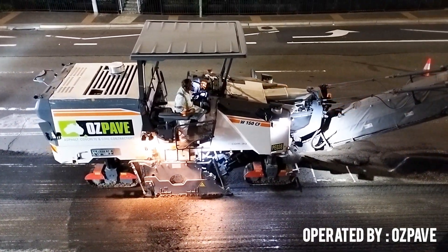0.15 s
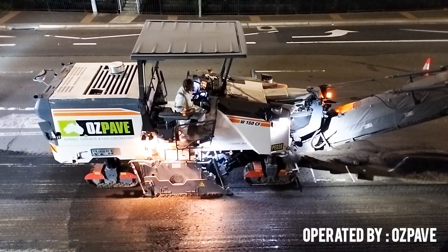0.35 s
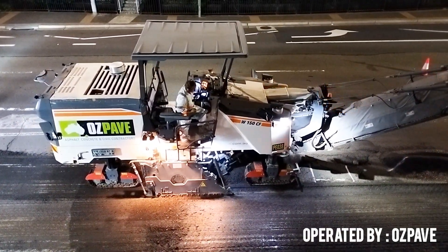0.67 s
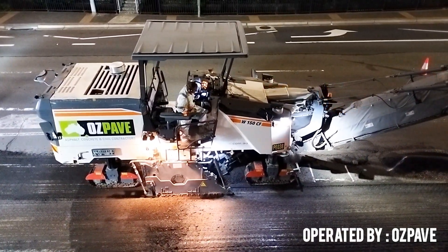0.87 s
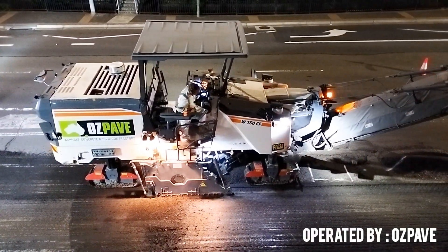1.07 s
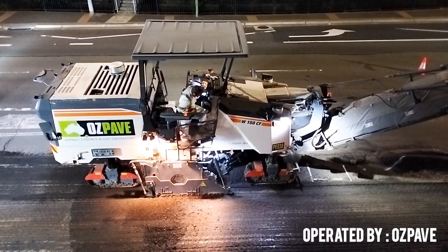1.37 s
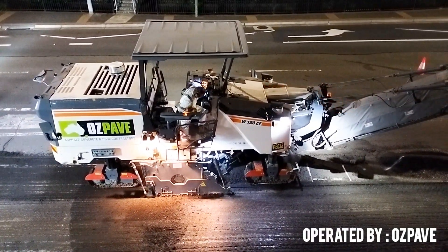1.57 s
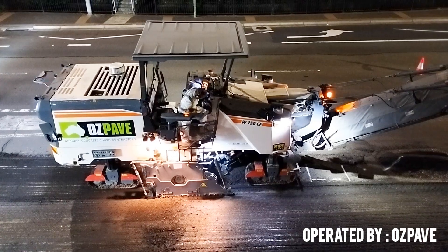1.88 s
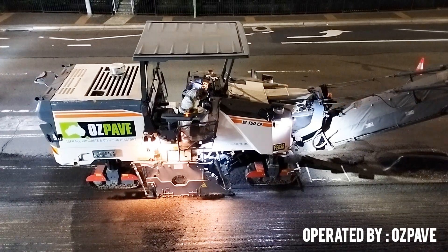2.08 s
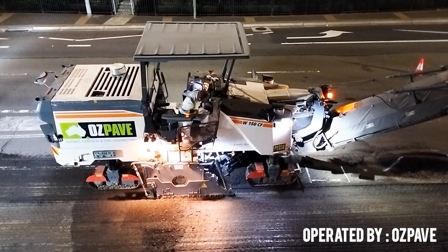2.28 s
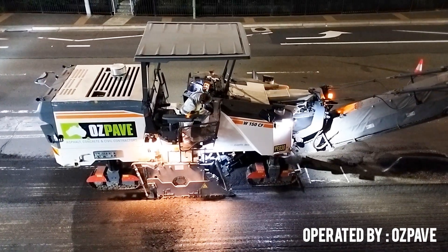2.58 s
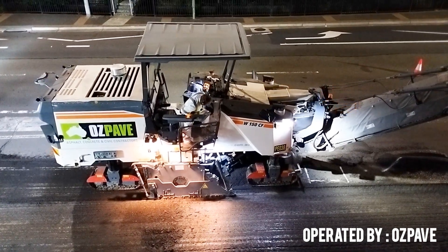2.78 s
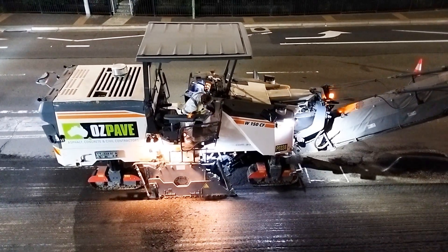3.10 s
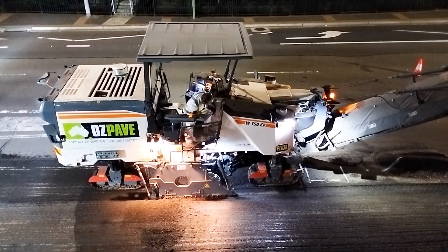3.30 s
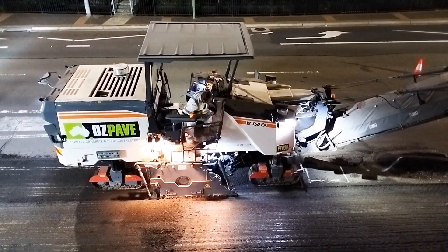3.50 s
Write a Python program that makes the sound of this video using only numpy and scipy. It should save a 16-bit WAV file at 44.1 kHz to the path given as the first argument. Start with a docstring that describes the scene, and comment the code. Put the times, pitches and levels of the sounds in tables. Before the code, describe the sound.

A heavy road milling machine drones and roars steadily as stones clatter down its metal chute.

```python
"""A road milling machine is heard from above through two spaced microphone ports.
The diesel drones as a sum of sines at its firing tone and weaker engine orders, with a turbo whistle of
wandering pitch, pump teeth and brief squeals. Fan, drum and conveyor roar as flickering filtered noise.
Stones strike the modes of a steel chute: a spill that dies away, with knocks at the start, a lone knock
near one second and a quick cluster near 1.6 seconds, each with a noise rattle; a low thud fades beneath."""
import sys
import numpy as np
from scipy import signal
from scipy.fft import rfft, irfft, next_fast_len
from scipy.io import wavfile
from scipy.ndimage import uniform_filter1d

SR = 44100
rng = np.random.default_rng(int(sys.argv[2]) if len(sys.argv) > 2 else 0)


def unload_audio(sound):
    """Save the sound as a 16-bit wav file, at the path given as the first command line argument."""
    columns = np.transpose(np.atleast_2d(sound))
    # keep every value between -1 and 1, then stretch to whole-number steps
    steps = np.round(np.clip(columns, -1, 1) * 32767)
    wavfile.write(sys.argv[1], SR, steps.astype(np.int16))


def decibels_to_gain(level_db):
    """Convert a level in decibels to a linear amplitude gain (20 dB per decade)."""
    exponent = np.asarray(level_db, float) / 20
    return 10 ** exponent


N = 160965  # samples

# Spectrum of the roar at the left port. Each row: frequency in Hz, density in dB per Hz before flicker.
ROAR_SPECTRUM = [(20, -76), (45, -59), (70, -48.5), (100, -46.5), (125, -44), (200, -40), (300, -41),
                 (420, -44), (520, -48), (650, -51), (820, -50), (1050, -55), (1300, -57), (2200, -62),
                 (3000, -65.5), (3900, -66.5), (4700, -72.5), (6200, -73), (7300, -73.5), (7900, -82),
                 (8400, -81), (11600, -81), (12600, -84), (14200, -87.5)]
# How the ports differ. Each row: frequency in Hz, right minus left level in dB, likeness from 0 to 1.
PORT_DIFFERENCE = [(25, 0, 0.95), (60, -1.5, 0.95), (150, 1.5, 0.98), (318, 0, 1), (454, 1.3, 0.78),
                   (694, 1, 0.43), (990, 0.5, 0.44), (1300, 1, 0.24), (2200, -4.5, 0.35), (2890, 1.5, 0.45),
                   (3700, 6, 0.01), (5200, 9.5, 0.33), (6180, 3.5, 0.07), (7340, 2.5, 0.07),
                   (8300, -6.5, .15), (9500, -31, .1), (10600, -1.5, 0), (11700, 2, 0), (12800, -11.5, 0.3),
                   (14200, -11, .05)]
# Slow level changes of the low roar and weaker orders. Each row: time in seconds, change in dB.
LOW_LEVEL = [(0, -0.5), (.3, -4), (.6, -1.5), (1.2, -0.9), (2.4, -1), (3.65, -0.9)]
# Firing tone of the diesel. Each row: time in seconds, frequency in Hz, rms level in dB before its waver.
FIRING_TONE = [(0.0, 102.2, -35), (0.01, 104.9, -26), (0.48, 102.5, -17.5), (0.58, 102.7, -21),
               (0.66, 102.9, -14), (1.1, 102.7, -15), (1.11, 102.6, -19.5), (1.28, 103.5, -14),
               (1.51, 102.1, -14), (1.66, 103, -19), (1.91, 103.4, -11), (2.3, 102.7, -16.5),
               (2.55, 102.6, -10.5), (2.89, 104, -19), (2.92, 103.5, -14), (3.28, 102.5, -14),
               (3.46, 101.1, -17.5), (3.65, 103.6, -11)]
# Weaker engine orders. Each row: multiple of the firing frequency, relative level in dB.
ENGINE_ORDERS = [(.25, -46), (.335, -46), (.6, -42), (.75, -38), (1.25, -35), (1.5, -30), (1.75, -33),
                 (2, -26), (2.25, -31), (2.5, -25), (2.7, -32), (2.85, -32), (3, -31), (3.25, -32),
                 (3.5, -32), (4, -33), (4.35, -35), (5.87, -40), (8.03, -42)]
# Pitch of the turbo whistle. Each row: time in seconds, frequency in Hz before its small jitter.
TURBO_PITCH = [(0.4, 11852), (0.63, 12193), (0.8, 11806), (1.04, 11702), (1.25, 12294), (1.43, 11941),
               (1.6, 11733), (1.8, 12124), (2.06, 11551), (2.25, 11461), (2.38, 11871), (2.55, 11623),
               (2.85, 11459), (2.98, 12045), (3.15, 11645), (3.4, 11431), (3.52, 11809), (3.63, 11686),
               (3.65, 11388)]
# Teeth of the hydraulic pump. Each row: multiple of the pump frequency, rms level at the start in dB.
PUMP_TEETH = [(6, -45), (7, -32), (8, -35)]
# Squeals of scraping steel, belts and tracks.
# Each row: middle in seconds, length in seconds, frequency in Hz, rms level at the middle in dB.
SQUEALS = [(0.075, .14, 1228, -29), (0.053, .2, 700, -32), (.05, .12, 3900, -35), (1.2, .1, 5600, -44),
           (1.48, 0.13, 5745, -46), (2.02, .08, 4700, -40.5), (2.1, .5, 9330, -52), (2.5, 0.11, 9500, -56),
           (3.0, .3, 3880, -48), (3.22, 0.16, 6700, -43)]
# Stones that strike the chute.
# Each row: start in seconds, relative level in dB, brightest frequency in Hz, spread in octaves.
STONE_KNOCKS = [(.0144, -5, 5140, .25), (.0702, -7, 3330, .9), (.1194, -15, 5600, .5),
                (.1444, -15, 2500, .6), (.2259, -8.5, 2050, 0.57), (.2744, -14, 5100, .3),
                (.3194, -20, 3420, .4), (.4499, -21, 2500, .9), (.623, -10, 2400, .4),
                (1.009, -17, 3300, .6), (1.563, -6.5, 2900, 0.79), (1.5794, -17, 2200, .9),
                (1.61, -13, 3200, .5), (1.6194, -16, 3700, .4)]
# Modes of the steel chute. Each row: frequency in Hz, relative level in dB, 60 dB decay time in seconds.
CHUTE_MODES = [(1230, -5, .1), (1900, -1, .02), (2350, -1, .022), (2650, -1, .018), (3050, -4, .015),
               (3400, -4, .03), (3870, -7, .02), (4470, -11, .015), (5140, -6, .04), (5600, -9, .02),
               (6300, -14, .015)]
# Colour of the loose rattle. Each row: frequency in Hz, gain in dB.
RATTLE_COLOUR = [(400, -16), (700, -4), (1230, 10), (2400, -2), (3500, 8), (5200, 1.5), (6500, 1),
                 (8000, -27), (10000, -36), (14000, -40)]

LAG_S = 0.000517  # delay of the right port
LEAD_RAD, LEAD_HZ = 0.61, 198  # phase lead that sets in above the bass and offsets part of the delay
HISS_FLICKER_DB = 0.8  # shared by the two highest octaves
ORDER_TRIM_DB, ORDER_WAVER_DB, ORDER_WAVER_RAD = -0.4, 3, 0.31
TURBO_DB, TURBO_WAVER_DB, TURBO_JITTER_HZ = -54.5, 3.1, 12
PUMP_HZ, PUMP_EASE_S, PUMP_EASE_DB = 426.2, 0.45, -22
SPILL_DB, SPILL_T60_S, SPILL_PER_S, SPILL_RING_DB = -16.5, 1.6, 2500, -25.5
THUD_HZ, THUD_DB, THUD_T60_S = 85.6, -19.5, 1.8
KNOCK_DB, BOUNCE_S, BOUNCE_DB = -4, 0.004, -2
KNOCK_TAIL_DB, KNOCK_TAIL_S, KNOCK_TAIL_HZ = -15.5, 0.028, 4300  # level, time constant, low-pass
CONTACT_S = 0.00009  # two standard deviations of the contact pulse


def slope(table, hz, axis=1):
    """Interpolation on a log-frequency axis: reads one column of a table."""
    a = np.array(table, float)
    return np.interp(np.log(hz + 1), np.log(a[:, 0]), a[:, axis])


def curve(table, axis=1):
    """Linear interpolation in time: reads one column of a table at every sample."""
    a = np.array(table, float)
    return np.interp(np.arange(N) / SR, a[:, 0], a[:, axis])


def walk(rate):
    """Band-limited fluctuation: random values, rate per second, smoothed twice; spread near 1."""
    k = int(SR / rate)
    held = np.repeat(rng.standard_normal(N // k + 1), k)
    smooth = uniform_filter1d(uniform_filter1d(held, k), k)
    return 1.47 * smooth[:N]


def tone(phase, db):
    """Simple harmonic motion: a sine of given rms level and random starting phase."""
    return np.sqrt(2) * decibels_to_gain(db) * np.sin(phase + 2 * np.pi * rng.random())


def ring(x, hz, t60):
    """Damped resonance: a complex pole gives one exponentially decaying mode."""
    pole = np.exp(2j * np.pi * hz / SR - np.log(1000) / (max(t60, .004) * SR))
    return signal.lfilter([1], [1, -pole], x).imag


def ports(left, other):
    """Partial coherence: the right port hears a late, coloured mix of the left signal and another."""
    pad = 4096
    m = next_fast_len(N + 2 * pad)
    hz = np.arange(m // 2 + 1) * SR / m
    like = np.clip(slope(PORT_DIFFERENCE, hz, axis=2), 0, 1)
    lead = LEAD_RAD * (1 - np.exp(-(hz / LEAD_HZ) ** 2))
    turn = np.exp(1j * (lead - 2 * np.pi * hz * LAG_S))
    a, b = rfft(np.pad([left, other], ((0, 0), (pad, m - N - pad)), "reflect"))
    mix = like * a + np.sqrt(1 - like ** 2) * b  # keeps the power of unrelated signals
    right = irfft(decibels_to_gain(slope(PORT_DIFFERENCE, hz)) * turn * mix, m)
    return np.array([left, right[pad:pad + N]])


def firing():
    """Periodic combustion: a firing tone, and orders at its multiples that waver in level and phase."""
    phase = 2 * np.pi * np.cumsum(curve(FIRING_TONE)) / SR
    out = tone(phase, curve(FIRING_TONE, axis=2) + 0.52 * walk(11.2))
    for multiple, db in ENGINE_ORDERS:
        level = db + curve(LOW_LEVEL) + ORDER_TRIM_DB + ORDER_WAVER_DB * walk(5.82)
        out = out + tone(multiple * phase + ORDER_WAVER_RAD * walk(5.3), level)
    return out


def turbo():
    """Frequency modulation: the whistle is a sine whose pitch rises and falls, with a slight jitter."""
    hz = curve(TURBO_PITCH) + TURBO_JITTER_HZ * walk(40)
    return tone(2 * np.pi * np.cumsum(hz) / SR, TURBO_DB + TURBO_WAVER_DB * walk(12.1))


def pump():
    """Tooth-passing tones: steady harmonics of the hydraulic pump, loud at first and easing."""
    t = np.arange(N) / SR
    ease = PUMP_EASE_DB * (1 - np.exp(-(t / PUMP_EASE_S) ** 2))
    return sum(tone(2 * np.pi * k * PUMP_HZ * t, db + ease) for k, db in PUMP_TEETH)


def squeals():
    """Frictional whine: sines of unsteady phase swell and fade, 12 dB down at the ends of their length."""
    t = np.arange(N) / SR
    out = 0
    for middle, length, hz, db in SQUEALS:
        level = db - 12 * ((t - middle) / length * 2) ** 2
        out = out + tone(2 * np.pi * hz * t + 2.4 * walk(50), level)
    return out


def engine():
    """Superposition: all machine tones add, and a copy 300 samples later feeds the other path."""
    out = firing() + turbo() + pump() + squeals()
    return ports(out, np.roll(out, 300))


def roar():
    """Broadband noise: fan, drum and conveyor are octave bands that flicker, the treble together."""
    hz = np.arange(N // 2 + 1) * SR / N
    spectrum = rfft(rng.standard_normal((2, N))) * decibels_to_gain(slope(ROAR_SPECTRUM, hz)) * np.sqrt(SR / 2)
    out, hiss = 0, walk(22.1)
    for k in range(10):
        share = np.clip(1 - abs(np.log2((hz + 1) / 31.25) - k), 0, 1)  # overlapping octaves
        db = 0.5 * walk(11)
        if k < 5:
            db = db + curve(LOW_LEVEL)
        if k > 7:
            db = db + HISS_FLICKER_DB * hiss
        out = out + decibels_to_gain(db) * irfft(spectrum * share, N)
    return ports(*out)


def chute(pushes):
    """Modal synthesis: each push drives one plate mode, and the contact time softens the sum."""
    out = 0
    for j, (hz, db, t60) in enumerate(CHUTE_MODES):
        out = out + (-1) ** j * decibels_to_gain(db) * ring(pushes[j], hz, t60)  # neighbours in opposite sign
    offset_s = np.arange(-8, 9) / SR
    contact = np.exp(-0.5 * (offset_s / CONTACT_S * 2) ** 2) / 4
    return np.convolve(out, contact, "same")


def rattle(noise):
    """Linear filtering: shapes noise to the colour of loose stones."""
    hz = np.arange(N // 2 + 1) * SR / N
    return irfft(rfft(noise) * decibels_to_gain(slope(RATTLE_COLOUR, hz)), N)


def spill():
    """Shot noise: random grains of grit over a faint noise die away while noise rings the chute."""
    fade = decibels_to_gain(SPILL_DB - 60 * np.arange(N) / SR / SPILL_T60_S)
    grains = (rng.random((2, N)) < SPILL_PER_S / SR) * decibels_to_gain(2.3 * rng.exponential(size=N))
    loose = rattle(fade * (grains + 0.16) * rng.standard_normal((2, N)))
    pushes = decibels_to_gain(SPILL_RING_DB) * fade * rng.standard_normal((len(CHUTE_MODES), N))
    return loose + chute(pushes)


def thud():
    """Narrowband resonance: the load shakes the frame, a noise-driven low mode that fades."""
    shake = ring(rng.standard_normal(N), THUD_HZ, 0.64)
    return decibels_to_gain(THUD_DB - 60 * np.arange(N) / SR / THUD_T60_S) * shake / shake.std()


def knocks():
    """Impulse response: each stone strikes modes near its own pitch, bounces once and leaves a rattle."""
    start, level, bright, spread = np.array(STONE_KNOCKS, float).T
    at = (start * SR).astype(int)
    size = 1 + 0.25 * rng.standard_normal((len(at), len(CHUTE_MODES), 2))  # strike and bounce vary
    pushes = np.zeros((len(CHUTE_MODES), N))
    for j, (hz, _, _) in enumerate(CHUTE_MODES):
        focus = np.maximum(-6 * (np.log2(hz / bright) / spread) ** 2, -13)
        gain = decibels_to_gain(level + KNOCK_DB + focus)
        pushes[j, at] += gain * size[:, j, 0]
        pushes[j, at + int(BOUNCE_S * SR)] += gain * size[:, j, 1] * decibels_to_gain(BOUNCE_DB)
    env = np.zeros(N)
    env[at] = decibels_to_gain(level + KNOCK_TAIL_DB)
    env = signal.lfilter([1], [1, -np.exp(-1 / (KNOCK_TAIL_S * SR))], env)
    low_pass = signal.butter(2, KNOCK_TAIL_HZ, fs=SR)
    tail = signal.lfilter(*low_pass, env * rng.standard_normal((2, N)))
    return rattle(tail) + chute(pushes)


def stones():
    """Superposition: spill, thud and knocks add before they reach the ports."""
    return ports(*(spill() + thud() + knocks()))


def scene():
    """Superposition: engine, roar and stones add at the two ports."""
    return engine() + roar() + stones()


def roll_off(x):
    """The treble ends steeply here."""
    return signal.sosfilt(signal.butter(12, 14130, fs=SR, output="sos"), x)


def record(dry):
    """Soft saturation: a hyperbolic tangent rounds off the peaks."""
    mix = np.tanh(0.96 * dry) / 0.87
    return roll_off(mix)


dry = scene()
out = record(dry)
unload_audio(out)
```